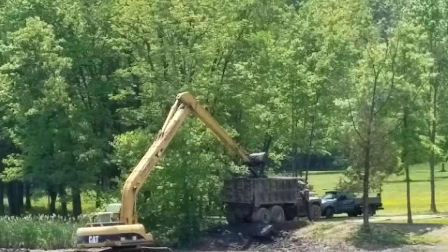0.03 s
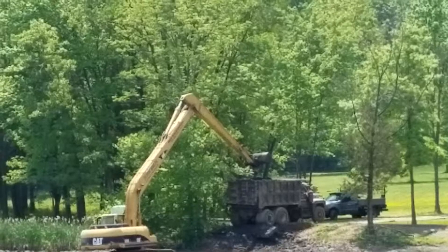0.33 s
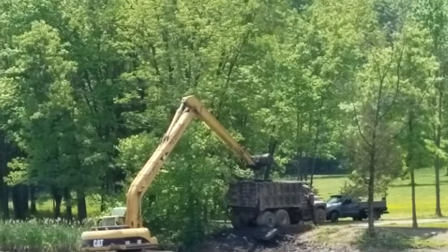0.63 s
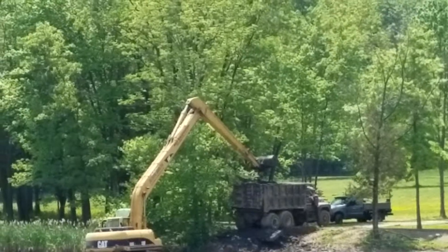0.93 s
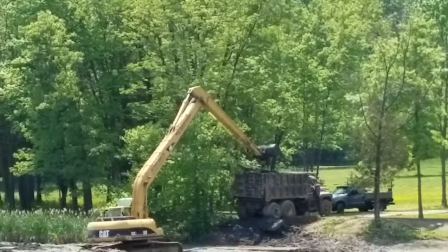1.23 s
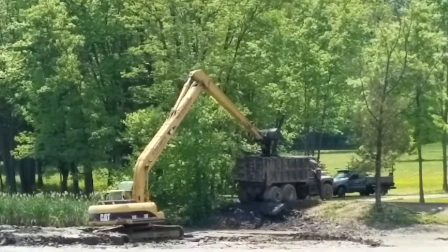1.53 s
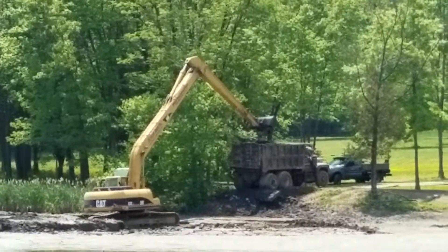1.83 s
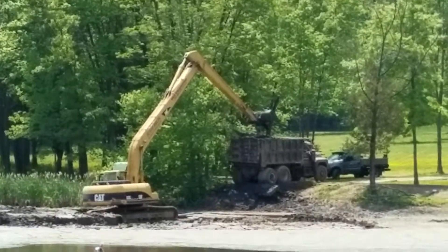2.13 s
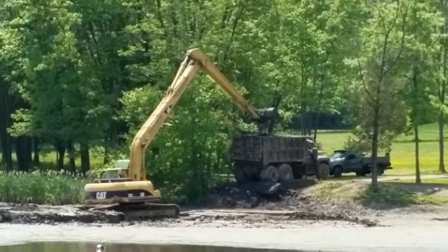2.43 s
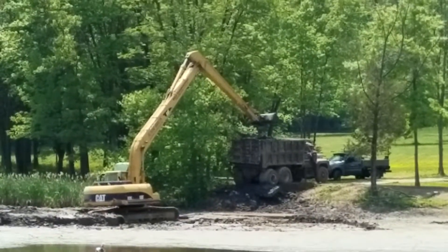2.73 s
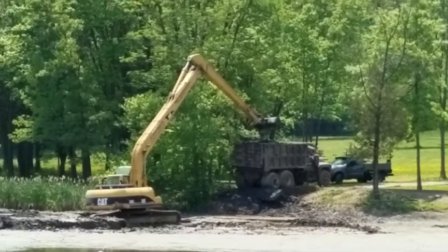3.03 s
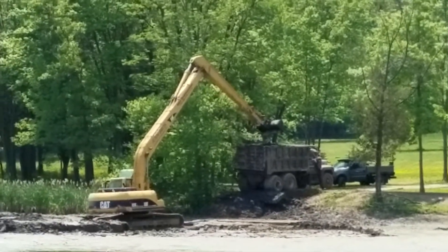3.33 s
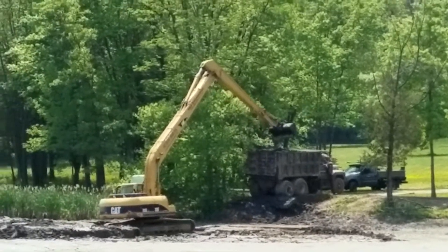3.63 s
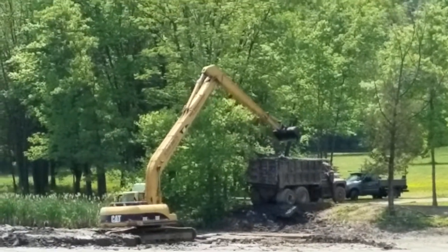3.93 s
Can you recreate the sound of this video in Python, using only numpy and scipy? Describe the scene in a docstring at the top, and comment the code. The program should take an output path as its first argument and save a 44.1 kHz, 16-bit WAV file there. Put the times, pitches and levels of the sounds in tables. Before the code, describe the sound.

An excavator bucket knocks and rattles over a dump truck in two bouts, echoing off trees across a pond. A far diesel drones while wind buffets the microphone. As the knocks fade, small birds chirp and sharp ticks sound close by.

```python
"""A long-reach excavator shakes its bucket out over a dump truck, heard across a pond on a hand-held camera.
After a short silence everything comes in low, with the far diesel, then opens up half a second in. Steel knocks
and chatters in two bouts, the wood behind throwing back a long wash, while wind buffets the two microphone
ports. A bird calls between the bouts. Short bright ticks and gritty scuffs follow, the first on the steel blow
at two seconds. The knocks die away near three seconds; small birds call over diesel and wind."""
import sys
import numpy as np
from scipy import signal
from scipy.fft import rfft, irfft
from scipy.io import wavfile

SR = 44100
rng = np.random.default_rng(int(sys.argv[2]) if len(sys.argv) > 2 else 0)


def waveform_to_disk(signal):
    """Save audio, clipped to [-1, 1], as 16-bit WAV at the path in sys.argv[1]."""
    frames = np.transpose(np.atleast_2d(signal))
    scaled = np.clip(frames, -1, 1) * 32767
    samples = np.round(scaled).astype(np.int16)
    wavfile.write(sys.argv[1], SR, samples)


N = 176400

# far sound at the two ports (frequency [Hz], likeness [0-1], left lead [rad], left minus right [dB])
PORT_RESPONSE = [(100, 1, 1, 7), (600, 0.99, -0.75, -0.5), (1240, 0.82, -0.84, 1), (1830, 0.55, -2, 3),
                 (2580, 0, -3.5, -1), (3900, 0.42, -8, -3), (5870, 0, -8, -4.5), (6900, 0.96, -15, -0.5),
                 (9150, 0.18, -8.5, 1.5)]
# diesel and fan across the pond (frequency [Hz], relative density [dB])
DIESEL_SPECTRUM = [(40, -3), (120, 6.5), (300, 0), (900, -6), (2000, -4), (4200, -15.5), (5400, -22.5),
                   (7000, -25), (8800, -48.5)]
# swell of the diesel (time [s], level [dB])
DIESEL_LEVEL = [(.55, -34), (1.3, -33.5), (1.85, -41.5), (2.5, -32.5), (3.2, -39), (4, -42.5)]
# far bird notes (time [s], length [s], start pitch [Hz], end pitch [Hz], level [dB], rasp [0-1])
BIRD_NOTES = [(1.75, .11, 4800, 3780, -53.5, .014), (3.335, .045, 4950, 4720, -46.5, .022),
              (3.375, .035, 4900, 4850, -47.5, .03), (3.535, .06, 3650, 3430, -50, .015),
              (3.59, .105, 3400, 2920, -45, .016), (3.695, .045, 2940, 3020, -45, .012),
              (3.8, .2, 6900, 6600, -59, .06)]
# short bright ticks and gritty scuffs (time [s], level [dB], left minus right [dB], decay [s])
TICKS_AND_SCUFFS = [(2.012, -55, 0, .035), (2.316, -55.5, -3, .035), (2.39, -37, 15, .002),
                    (2.40, -54, 3, .025), (3.204, -45, 6, .0012), (3.614, -28, 17, .0008),
                    (3.885, -25.5, 19, .0008)]
# colour of a tick (frequency [Hz], relative density [dB])
TICK_SPECTRUM = [(2000, -20), (9000, -10), (13500, 1), (16000, -2)]
# deep wind rumble and quicker flutter on the ports (frequency [Hz], relative density [dB])
RUMBLE_SPECTRUM = [(30, -43), (50, 0), (80, 8.5), (130, 7.5), (200, -17), (400, -84)]
FLUTTER_SPECTRUM = [(60, -18.5), (150, -0.5), (250, -1.5), (400, -3.5), (600, -16), (1000, -23),
                    (2500, -82)]
# gusts of rumble and of flutter (time [s], relative level [dB])
RUMBLE_GUSTS = [(.55, -64), (.65, -30), (.72, -25.5), (.88, -22), (1.0, -24), (1.2, -29), (1.41, -58),
                (1.5, -38.5), (1.9, -39), (2.2, -32), (2.9, -35.5), (3.2, -41), (3.36, -31.5), (3.5, -34.5),
                (3.88, -34.5), (4, -50)]
FLUTTER_GUSTS = [(.4, -30), (.58, -47.5), (.68, -39), (.88, -25), (1.03, -38), (1.22, -26.5), (1.38, -47.5),
                 (1.48, -39), (1.78, -26.5), (1.89, -36), (2.05, -28.5), (2.35, -31), (2.6, -28.5),
                 (3.02, -29), (3.22, -42.5), (3.37, -25.5), (3.47, -39.5), (3.6, -27), (3.88, -36),
                 (4, -49.5)]
# single buffets on the ports (time [s], level [dB], frequency [Hz], left minus right [dB])
WIND_BUFFETS = [(0.681, -11, 135, -19), (0.737, -16.5, 76, 20), (0.811, -20, 90, -8),
                (0.84, -20, 78.6, -14), (0.937, -12.5, 141, -3), (1.941, -14, 266, -28),
                (2.414, -14.5, 307, -13), (3.359, -18, 358, 9), (3.3675, -19, 417, 7),
                (3.383, -14.5, 328, -13)]
# squeals of steel on steel (time [s], length [s], pitch [Hz], level [dB])
PIN_SQUEALS = [(.535, .125, 3590, -43.5), (1.985, .135, 2755, -43), (2.445, .055, 3590, -39),
               (2.44, .06, 1500, -32)]
# ringing of bucket and truck bed (frequency [Hz], relative level [dB])
STEEL_MODES = [(571, -11), (670, -9.5), (712, -10), (931, -15), (1008, -14), (1120, -10), (1190, -12),
               (1263, -13), (1410, -13), (1453, -13), (1884, -20), (1993, -18), (2164, -20), (2735, -22),
               (2820, -21), (3578, -20), (3690, -23)]
# dense clatter of the plates (frequency [Hz], relative density [dB])
PLATE_SPECTRUM = [(100, -20), (300, -11.5), (600, 0.5), (900, -7), (1300, -7.5), (1750, -9), (2100, -5),
                  (2400, -14), (4200, -14), (5100, -24), (7000, -24.5), (9200, -44), (15000, -43.5)]
# bucket blows (time [s], relative level [dB], tilt [dB/octave], extra clank [dB], plate note [Hz])
BUCKET_BLOWS = [(.547, -33.5, 1, -1.5, 1050), (.566, -40.5, -0.5, 12, 1000), (.592, -31.5, -0.5, 1, 1130),
                (.849, -21, -0.4, -0.5, 715), (.892, -33.5, 1, 6, 1200), (.955, -34.5, -7, 2.5, 570),
                (1.038, -31.5, -0.5, 4, 1400), (1.081, -34, -2, -1, 1000), (1.153, -29.5, 1, 1.5, 570),
                (1.168, -23, -1, -2, 740), (1.204, -27.5, -1, 0.5, 1440), (1.245, -34.5, 0, -3, 670),
                (1.444, -28.5, -2, 1.5, 1460), (1.534, -34.5, 0.5, 2.5, 1950),
                (1.92, -35.5, -2.5, 2.5, 900), (2.007, -26, -2, 4.5, 1130), (2.04, -31, -2, 6, 840),
                (2.158, -40.5, -3.5, 7, 820), (2.328, -36.5, -4, 5.5, 680), (2.403, -35, 1.5, 4.5, 1500),
                (2.457, -26, -1, 2.5, 1430), (2.498, -29, -4.5, 1, 670), (2.557, -24.5, 0.5, 4, 570),
                (2.576, -20, -1.5, 2.5, 672), (2.605, -22.5, -0.5, 4.5, 1080), (2.645, -31, 0.5, 5, 1400),
                (2.68, -27, 0, 0, 930), (2.708, -28.5, -2, -9, 710), (2.768, -29, -0.5, -1.5, 570),
                (2.877, -33.5, -0.5, -1.5, 890)]

WOOD_T60_S, WOOD_TREBLE_T60_S, WOOD_BUILD_S, WOOD_TOP_HZ = 1.79, 0.9, 0.016, 7500
FIRING_HZ, THROB_DEPTH = 108.5, 0.05
BIRD_ECHO_S, BIRD_ECHO_DB, BIRD_ECHO_TOP_HZ, BIRD_WOOD_DB = 0.11, -5, 3000, -5.5
RUMBLE_DB, FLUTTER_DB, FLUTTER_PAN_DB, EDDIES_PER_S = -0.5, 0.5, -5, 90
RISE_S, STRIKE_DB, CRACK_S, CLANK_HZ, CLANK_OCTAVES = 0.012, 13.5, 0.024, 1290, 0.5
CHATTER_S, CHATTER_DB, CHATTER_PER_S, CHATTER_SPREAD_DB = 0.06, -2, 220, 1.5
RING_DB, RING_T60_AT_1KHZ_S, RING_TOP_HZ, MODE_SCATTER_DB = -6, 0.23, 4760, 2.5
NOTE_DB, NOTE_DECAY_S, NOTE_DETUNE = -2.5, 0.034, 0.0437
BUCKET_WOOD_DB, HISS_DB = -6.5, -65
START_S, FADE_IN_S, OPEN_S, OPENING_S, MUTED_DB, TOP_HZ = 0.36, 0.12, 0.5285, 0.024, -16, 15900


def undb(db):
    """Decibels to gain."""
    return 10 ** (np.asarray(db) / 20)


def unit(x):
    """Scale to rms 1."""
    return x / np.sqrt(np.mean(x ** 2))


def clock():
    """Time of each sample in seconds."""
    return np.arange(N) / SR


def curve(rows):
    """Gain over time from (time [s], level [dB]) points."""
    return undb(np.interp(clock(), *np.array(rows).T))


def per_bin(rows):
    """Each column of a table over frequency, spread on the bins of a double-length spectrum."""
    hz, *columns = np.array(rows, float).T
    bins = np.log(np.arange(N + 1) * SR / (2 * N) + 1)
    return [np.interp(bins, np.log(hz), column) for column in columns]


def shape(x, gain):
    """Filter by a gain per bin."""
    return irfft(rfft(x, 2 * N) * gain)[..., :N]


def colour(x, rows):
    """Filter by (frequency [Hz], level [dB]) points; white noise keeps its power."""
    return shape(x, unit(undb(per_bin(rows)[0])))


def lowpass(x, hz, order=2):
    """Roll off the treble above hz."""
    return signal.sosfilt(signal.butter(order, hz, fs=SR, output="sos"), x)


def walk(per_s):
    """Random wander of rms 1 that turns per_s times a second."""
    points = rng.standard_normal(4096)
    return unit(np.interp(clock() * per_s, np.arange(len(points)), points))


def panned(x, pan_db):
    """Place a sound between left and right at constant power."""
    return x * unit(undb(np.array([[pan_db], [-pan_db]]) / 2))


def ports(pair):
    """Far sound reaches the two microphone ports alike in the bass, shifted and apart higher up."""
    likeness, lead, pan_db = per_bin(PORT_RESPONSE)
    likeness = np.clip(likeness, 0, 1)
    shared = shape(pair[0], likeness * np.exp(-1j * lead))
    apart = shape(pair[1], np.sqrt(1 - likeness ** 2))
    return shape(np.array([pair[0], shared + apart]), undb(np.array([pan_db, -pan_db]) / 2))


def wood(x):
    """Scatter from the trees behind the far bank: builds up, then fades, the treble first."""
    t = clock()
    noise = rng.standard_normal((2, N))
    low = lowpass(noise, 1800, order=1)
    tail = low * undb(-60 * t / WOOD_T60_S) + (noise - low) * undb(-60 * t / WOOD_TREBLE_T60_S)
    tail = unit(tail * (1 - np.exp(-t / WOOD_BUILD_S))) / np.sqrt(N)
    return signal.fftconvolve(np.atleast_2d(x), lowpass(tail, WOOD_TOP_HZ), axes=1)[:, :N]


def diesel():
    """Engine roar from across the pond, pulsing with each firing."""
    firings = np.cumsum(FIRING_HZ * (1 + 0.0117 * walk(2.84))) / SR
    throb = 1 + THROB_DEPTH * np.cos(2 * np.pi * firings)
    roar = rng.standard_normal((2, N)) * throb * undb(0.34 * walk(25))
    return colour(roar, DIESEL_SPECTRUM) * curve(DIESEL_LEVEL)


def birds():
    """Thin, distant notes that slide and level out with a little rasp, echoed by the trees."""
    song = np.zeros(N)
    for start, length, from_hz, to_hz, db, rasp in BIRD_NOTES:
        progress = np.clip((clock() - start) / length, 0, 1)
        hz = (to_hz + (from_hz - to_hz) * (1 - progress) ** 2.1) * (1 + rasp * walk(600))
        swell = np.abs(np.sin(np.pi * progress)) ** 0.68
        song += undb(db) * swell * np.sin(2 * np.pi * np.cumsum(hz) / SR)
    echo = lowpass(np.interp(clock() - BIRD_ECHO_S, clock(), song), BIRD_ECHO_TOP_HZ)
    return song + undb(BIRD_ECHO_DB) * echo + undb(BIRD_WOOD_DB) * wood(song)


def ticks():
    """Bright bursts of noise: gritty scuffs near the centre, sharp ticks toward the left port."""
    bursts = np.zeros((2, N))
    for start, db, pan_db, decay in TICKS_AND_SCUFFS:
        age = clock() - start
        fade = (age >= 0) * np.exp(-np.abs(age) / decay)
        bursts += panned(undb(db) * rng.standard_normal((2, N)) * fade, pan_db)
    return colour(bursts, TICK_SPECTRUM)


def eddies(spectrum, spread_db):
    """Turbulence hits each port on its own: two unrelated noises of unsteady level."""
    pair = [rng.standard_normal(N) * undb(spread_db * walk(EDDIES_PER_S)) for _ in range(2)]
    return np.array([unit(colour(noise, spectrum)) for noise in pair])


def wind():
    """Wind right on the microphone: deep rumble, quick flutter and single buffets."""
    rumble = eddies(RUMBLE_SPECTRUM, spread_db=4) * curve(RUMBLE_GUSTS)
    flutter = eddies(FLUTTER_SPECTRUM, spread_db=3.5) * curve(FLUTTER_GUSTS)
    pressure = undb(RUMBLE_DB) * rumble + undb(FLUTTER_DB) * panned(flutter, FLUTTER_PAN_DB)
    for peak_s, db, hz, pan_db in WIND_BUFFETS:
        spread = (np.pi * hz * (clock() - peak_s)) ** 2
        pulse = (1 - 2 * spread) * np.exp(-spread)  # one push between two shallow dips
        pressure += panned(undb(db) * pulse, pan_db)
    return pressure


def squeals():
    """The bucket's pins catch and sing briefly, each squeal on one wavering note."""
    sound = np.zeros(N)
    for start, length, hz, db in PIN_SQUEALS:
        progress = np.clip((clock() - start) / length, 0, 1)
        phase = 2 * np.pi * np.cumsum(hz * (1 + 0.00585 * walk(400))) / SR
        sound += undb(db) * np.sin(np.pi * progress) * np.sin(phase)
    return sound


def contact(hz, tilt_db, clank_db):
    """Gain of one blow over frequency: a tilt about 1 kHz and a broad hump of clank."""
    hz = np.clip(hz, 400, 5000)
    clank = np.exp(-0.5 * (np.log2(hz / CLANK_HZ) / CLANK_OCTAVES) ** 2)
    return undb(tilt_db * np.log2(hz / 1000) + clank_db * clank)


def steel_modes(hz, t):
    """Bucket and truck bed ring in damped modes, one a row; the higher ones die sooner."""
    t60 = RING_T60_AT_1KHZ_S / np.sqrt(hz[:, None] / 1000)
    modes = np.cos(2 * np.pi * hz[:, None] * t) * undb(-60 * t / t60)
    return lowpass(modes / np.linalg.norm(modes, axis=1, keepdims=True), RING_TOP_HZ)


def plate_note(hz, t):
    """The struck plate's own note: two close partials that beat as they die."""
    phase = 2 * np.pi * hz * (t - RISE_S)
    return (np.sin(phase) + 0.5 * np.sin(phase * (1 + NOTE_DETUNE))) * np.exp(-t / NOTE_DECAY_S)


def bucket():
    """On the far bank, each blow is a strike, a crack and a chatter of loose steel that set it ringing."""
    size = SR // 2
    t = np.arange(size) / SR
    bin_hz = np.fft.rfftfreq(size, 1 / SR)
    mode_hz, mode_db = np.array(STEEL_MODES).T
    modes = steel_modes(mode_hz, t)
    rattle = unit(undb(CHATTER_SPREAD_DB * walk(CHATTER_PER_S)))
    rise = np.minimum(t / RISE_S, 1)
    crack = np.exp(-np.maximum(t - RISE_S, 0) / CRACK_S)
    force, ringing = np.zeros((2, 2, N + size))
    for start, db, tilt_db, clank_db, note_hz in BUCKET_BLOWS:
        span = slice(int(start * SR), int(start * SR) + size)
        chatter = undb(CHATTER_DB) * np.exp(-t / CHATTER_S) * rattle[span]
        push = rng.standard_normal((2, size)) * np.hypot(crack, chatter) * rise
        push[0, int(RISE_S * SR)] += undb(STRIKE_DB)  # the hard strike
        push = undb(db) * irfft(rfft(push) * contact(bin_hz, tilt_db, clank_db))
        force[:, span] += push
        # each blow lands somewhere else, so the mix of modes varies
        ring = undb(mode_db + MODE_SCATTER_DB * rng.standard_normal(len(mode_hz))) @ modes
        ringing[:, span] += undb(RING_DB) * signal.fftconvolve(push, ring[None], axes=1)[:, :size]
        note = plate_note(note_hz, t) * rise
        ringing[0, span] += undb(db + NOTE_DB) * contact(note_hz, tilt_db, clank_db) * note
    plates = colour(force[:, :N], PLATE_SPECTRUM)
    return plates + ringing[:, :N] + undb(BUCKET_WOOD_DB) * wood(plates)


def scene():
    """Machines and birds far off, wind at the microphone, bright ticks and a faint steady hiss."""
    hiss = undb(HISS_DB) * rng.standard_normal((2, N))
    return ports(bucket() + diesel()) + squeals() + birds() + wind() + ticks() + hiss


def record(dry):
    """The sound starts late and low, then opens to full level; the highest treble is cut."""
    t = clock()
    fade_in = np.clip((t - START_S) / FADE_IN_S, 0, 1)
    opened = np.clip((t - OPEN_S) / OPENING_S, 0, 1)
    gain = fade_in * undb(MUTED_DB * (1 - opened))
    return signal.sosfilt(signal.ellip(10, 0.2, 80, TOP_HZ, fs=SR, output="sos"), dry * gain)


dry = scene()
out = record(dry)
waveform_to_disk(out)
```